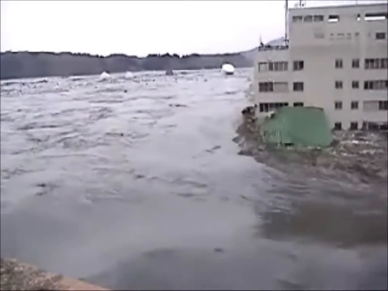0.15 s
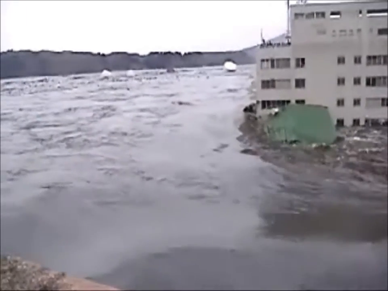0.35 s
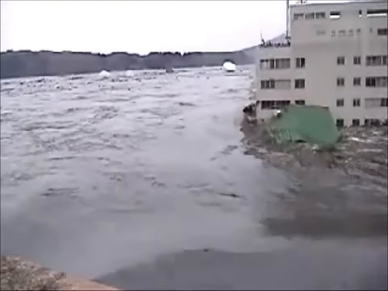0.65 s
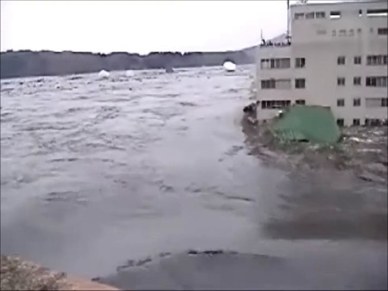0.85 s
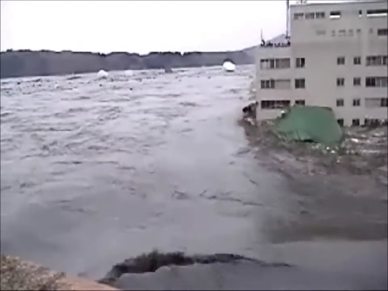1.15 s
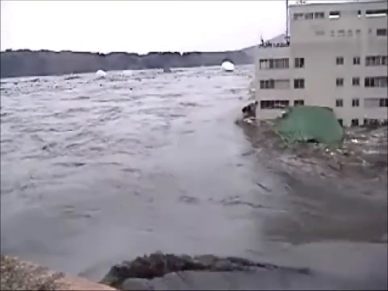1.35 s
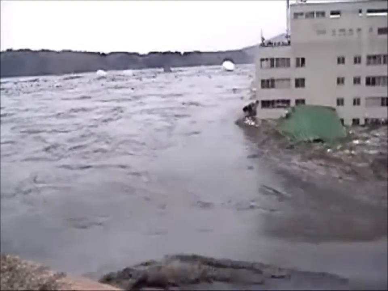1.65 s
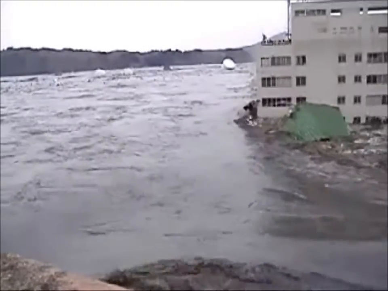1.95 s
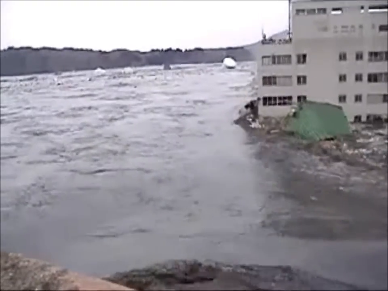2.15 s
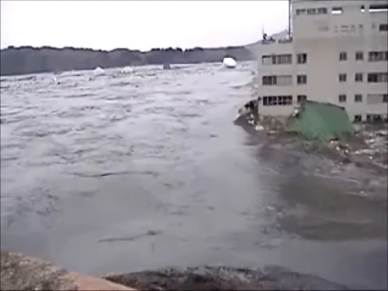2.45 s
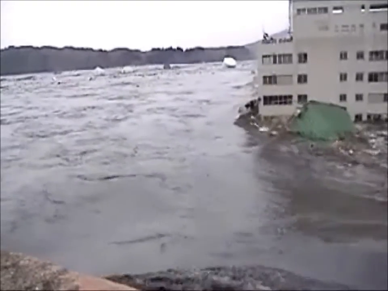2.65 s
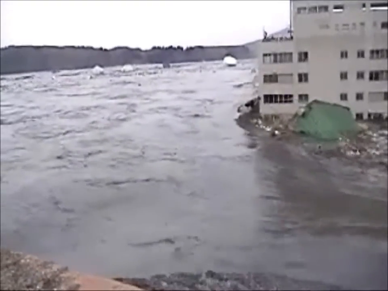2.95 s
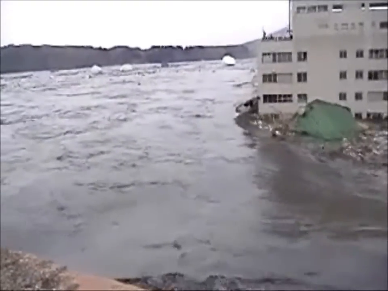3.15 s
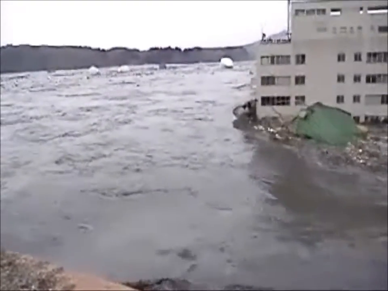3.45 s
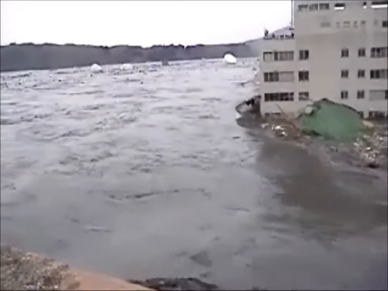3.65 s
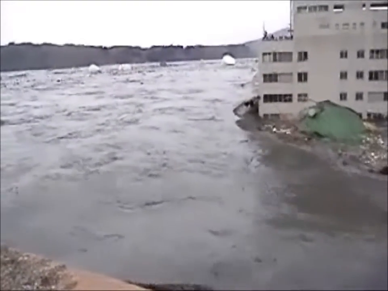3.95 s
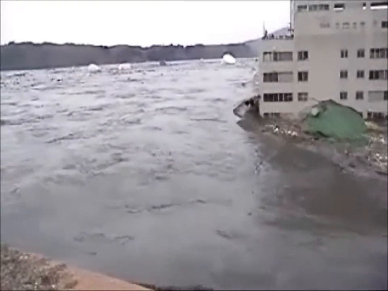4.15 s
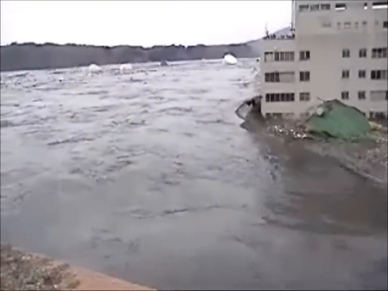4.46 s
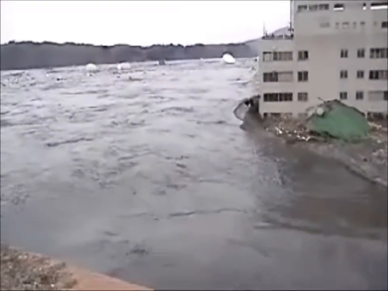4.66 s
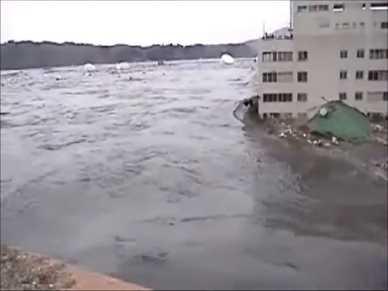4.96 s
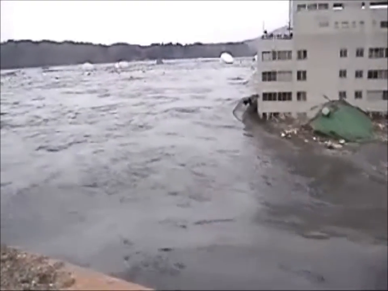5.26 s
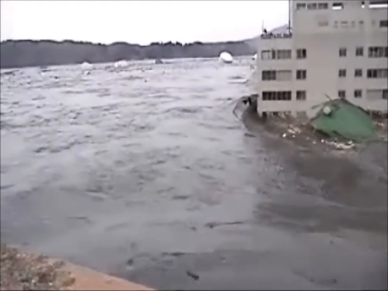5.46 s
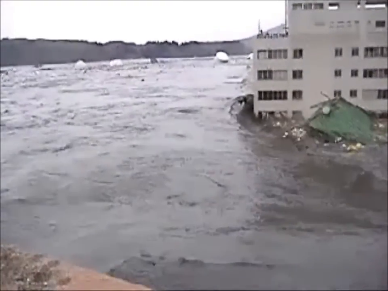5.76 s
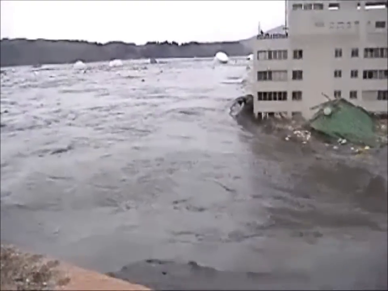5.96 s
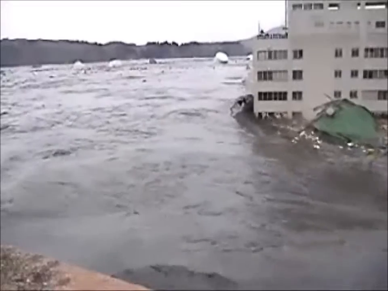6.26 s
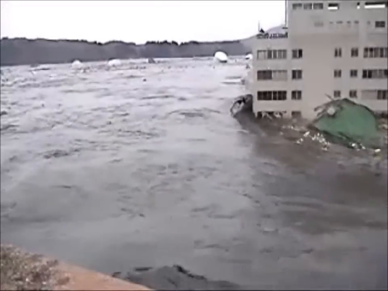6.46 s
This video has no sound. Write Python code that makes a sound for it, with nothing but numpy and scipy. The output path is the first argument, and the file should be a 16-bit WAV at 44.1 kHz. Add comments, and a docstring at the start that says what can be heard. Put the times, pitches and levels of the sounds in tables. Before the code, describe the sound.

A massive flood roars steadily through a harbour, with rushing, gurgling, hissing foam and spray, as wreckage knocks and splintering timber cracks.

```python
"""A harbour, heard in mono from a roof above the water while a tsunami pours through it.
Low-passed noise makes the roar of the flood; noise and ringing bubbles make its rush, slosh and gurgle.
Bright noise, fizz and random impulses make the foam, with splashes and single drops.
Wreckage cracks as bursts of impulses and knocks as damped modes; house fronts scatter it back.
"""
import sys
import numpy as np
from scipy import signal
from scipy.fft import rfft, irfft
from scipy.io import wavfile
from scipy.ndimage import uniform_filter1d

SR = 44100
rng = np.random.default_rng(int(sys.argv[2]) if len(sys.argv) > 2 else 0)


def materialize(psi):
    """Save the field psi as 16-bit PCM at rate SR to the path in sys.argv[1].

    A 1-D psi becomes a single channel; in a 2-D psi each row is a channel.
    """
    bounded = np.clip(np.atleast_2d(psi).T, -1, 1)
    quanta = np.round(bounded * 32767).astype(np.int16)
    wavfile.write(sys.argv[1], SR, quanta)


N = 291809
TIME = np.arange(N) / SR  # s
HZ = np.maximum(np.fft.rfftfreq(N, 1 / SR), 1)  # kept above 0 for the logarithm

# relative spectrum of the deep flood: frequency_hz, density_db [dB per Hz]
ROAR_SPECTRUM = [(12, -16), (25, -5.5), (55, 0), (100, 0.5), (175, 2.5), (230, 0.9), (310, -0.3), (410, -5),
                 (800, -11.5), (2000, -67.5)]
# relative spectrum of the broken surface: frequency_hz, density_db [dB per Hz]
RUSH_SPECTRUM = [(150, -14.5), (350, -9), (520, -2), (780, 0), (1000, -1.5), (1220, -6), (1700, -9.5),
                 (2100, -13), (4000, -53)]
# waves that swell above the steady rush: crest_s, gain_db, length_s
WAVE_SWELLS = [(0.112, 3, 0.46), (0.569, 2.6, 0.18), (1.45, 1.5, .6), (2.978, 2.5, 0.67), (5.82, 4.5, 0.12)]
# relative spectrum of foam and spray: frequency_hz, density_db [dB per Hz]
FOAM_SPECTRUM = [(600, -32), (1400, -1), (2000, 0.5), (2640, -2), (3200, -4), (4000, -5), (5000, -9),
                 (7000, -17.5), (8300, -24), (9300, -36.5)]
# course of the foam, before each layer's own gain; the slosh follows it: time_s, level_db
FOAM_LEVEL = [(0.03, -27.5), (0.62, -27.5), (0.73, -28.5), (0.795, -31.5), (0.84, -28), (1.35, -27.5),
              (1.74, -28), (1.85, -29.5), (2.4, -28.5), (2.7, -27.5), (2.82, -27), (3.5, -28), (4.4, -28.5),
              (4.85, -27.5), (5.15, -29), (5.68, -29), (5.9, -28.5), (6.58, -28.5)]
# waves breaking into spray, before the layer's gain: start_s, level_db, length_s
BREAKING_WAVES = [(0.391, -27, 0.039), (0.82, -24.5, 0.016), (0.925, -24, 0.04), (1.21, -21.5, 0.022),
                  (1.275, -21, 0.03), (1.333, -23, .012), (1.365, -21.5, .026), (1.464, -23, 0.018),
                  (1.535, -22.5, .016), (1.572, -20.5, .016), (1.603, -23, .016), (1.653, -20.5, .02),
                  (1.704, -21.5, .016), (1.757, -21, 0.022), (2.686, -19.5, 0.069), (4.765, -28, .03),
                  (4.828, -26, 0.05), (5.79, -23, 0.055)]
# relative spectrum of falling spray: frequency_hz, density_db [dB per Hz]
DROP_SPECTRUM = [(500, -10.5), (1300, 8), (2800, 5), (4200, -1), (5500, -11.5), (7500, -17.5), (9300, -34)]
# wreckage splintering, levels at the source: start_s, level_db, centre_hz, width_octaves, rise_s, t60_s
SPLINTERING = [ (2.869, -11.5, 3050, 1.9, .002, .09), (3.133, -28, 6500, 0.9, 0.0006, .03),
               (3.821, -21, 4170, 0.69, .0013, 0.052), (4.124, -18, 1920, 1.3, 0.0009, 0.16),
               (4.2555, -12.5, 3200, 1.2, .0008, .03), (4.264, -11, 4200, .6, .0008, .035),
               (4.376, -12.8, 3000, 1.4, .0009, .03), (4.92, -11, 2400, 1.7, .002, .08),
               (5.082, -18.5, 3470, 1.1, 0.00077, .035), (5.754, -11.5, 2900, .6, .0005, .13),
               (5.763, -15.3, 3300, 1.4, .002, .22), (6.184, -8.7, 3000, .8, .0004, .03),
               (6.207, -14.5, 2800, .5, .0012, .045), (6.244, -21.5, 2710, 0.74, 0.00084, 0.091),
               (6.525, -14, 3900, .55, .0008, .08), (6.537, -15.5, 4500, .7, .0008, .04),
               (6.589, -21, 4280, .5, .0005, 0.017), ]
# floating pieces colliding, levels at the source: start_s, level_db, pitch_hz, t60_s
COLLISIONS = [(0.453, -9.5, 800, .05), (0.536, -12.5, 1500, .07), (0.566, -9.5, 830, .08),
              (0.586, -11, 750, .05), (0.639, -13, 1680, .04), (0.655, -10, 1650, .06),
              (0.657, -5.5, 1070, .04), (0.68, -11, 1844, .03), (0.764, -8.5, 1740, .04),
              (0.776, -13, 2000, .025), (0.781, -4, 1140, .03), (3.822, -11.5, 1490, .055),
              (3.997, -10, 1530, .055), (4.925, -10, 1575, .07), (6.187, -11, 1285, .08),
              (6.243, -10, 1380, .075), (6.288, -16, 1290, .04)]
# modes of a floating piece: pitch_ratio (before scatter), level_db, t60_share
PIECE_MODES = [(1, 0, 1), (1.12, -8, .65), (1.53, -8, .7), (2.3, -18, .4)]

# how far the small waves move each level, dB per unit of lapping
RUSH_SWING_DB, SLOSH_SWING_DB, GURGLE_SWING_DB, FOAM_SWING_DB = 1.05, 2.4, 4, .85
SLOSH_FOLLOWS = 1.7  # dB of slosh per dB of foam
FIZZ_DB = -9  # relative to the hiss
# small debris bumping at random; its levels hold at the lowest pitch
BUMPS, BUMP_T60_S = 45, .05
BUMP_LO_HZ, BUMP_HI_HZ = 1072, 3370
BUMP_WEAK_DB, BUMP_STRONG_DB = -24, -18
PIECE_SCATTER = .05  # half the spread of the exponent that stretches the overtones
AIR_HZ, TOP_HZ = 5050, 9150  # cutoffs of the air path and of the microphone signal


def roar(level_db):
    """Turbulence: huge eddies and clouds of trapped air radiate steady broadband noise, mostly low."""
    return colour(rng.standard_normal(N), ROAR_SPECTRUM) * undb(level_db)


def rush(level_db, bubble_db, churn_db):
    """Superposition: many far waves merge into noise, while nearer bubbles resonate through it."""
    near = bubbles(lo_hz=423, hi_hz=1863, rate=700, cycles=25.6, spread_db=-1.5, count=24)
    wash = rng.standard_normal(N)
    water = colour(wash + undb(bubble_db) * near, RUSH_SPECTRUM)
    return water * undb(level_db + flow_db() + churn_db)


def flow_db():
    """Amplitude envelope: each big wave lifts the steady current's level in a Gaussian bell."""
    return sum(db * np.exp(-(2 * (TIME - crest) / length) ** 2) for crest, db, length in WAVE_SWELLS)


def slosh(level_db, lapping_db):
    """Impact noise: small waves slap the walls irregularly, harder when the water foams."""
    swing_db = 2
    foaming = curve(FOAM_LEVEL, axis=1)
    follow_db = SLOSH_FOLLOWS * (foaming - foaming.mean())
    db = level_db + follow_db + swing_db * walk(45) + lapping_db
    return unit(band(rng.standard_normal(N), 1334, 1.53)) * undb(db)


def gurgle(level_db, lapping_db):
    """Bubble resonance: large air pockets ring low, louder as each small wave folds over."""
    glugs = bubbles(lo_hz=480, hi_hz=1700, rate=150, cycles=36, spread_db=1.5, count=18)
    return unit(glugs * undb(lapping_db)) * undb(level_db)


def foam(gain_db, crackle_db, flicker_db, lapping_db):
    """Random excitation: spray hisses, ringing droplets fizz and small wreckage crackles unevenly."""
    fizz = bubbles(lo_hz=1528, hi_hz=7780, rate=930, cycles=88, spread_db=1.0, count=30)
    smear = rng.standard_normal(256) * np.exp(-TIME[:256] / 0.0022)
    crackle = unit(signal.oaconvolve(clicks(320, 1.2, N), smear)[:N])
    hiss = rng.standard_normal(N)
    spray = colour(hiss + undb(FIZZ_DB) * fizz + undb(crackle_db) * crackle, FOAM_SPECTRUM)
    return spray * undb(curve(FOAM_LEVEL, axis=1) + gain_db + flicker_db * walk(65) + lapping_db)


def splashes(level_db, drop_rate, drop_spread_db, rise_s, fall_s):
    """Droplet impact: waves break on wreckage, and spray patters and plinks down, then thins out."""
    throw = np.zeros(N)
    for start, db, length in BREAKING_WAVES:
        age = np.maximum(TIME - start, 0)
        onset = 1 - np.exp(-age / rise_s)
        thinning = np.exp(-np.maximum(age - length, 0) / fall_s)
        throw += undb(db) * onset * thinning
    plinks = bubbles(lo_hz=1500, hi_hz=5500, rate=500, cycles=90, spread_db=1.5, count=28)
    patter = unit(clicks(drop_rate, drop_spread_db, N))
    drops = patter + .5 * plinks + rng.standard_normal(N)
    return colour(drops, DROP_SPECTRUM) * throw * undb(level_db)


def droplets(level_db):
    """Lightly damped resonance: single nearby drops and bubbles ring out of the foam."""
    ringing = bubbles(lo_hz=2300, hi_hz=5200, rate=45, cycles=190, spread_db=1.5, count=36)
    return colour(ringing, DROP_SPECTRUM) * undb(curve(FOAM_LEVEL, axis=1) + level_db)


def cracks(fibre_rate, dust_db, skirt_db):
    """Fracture: timber snaps in a decaying burst of fibre impulses, a core with a wide, faint skirt."""
    out, t = np.zeros(N), TIME[:16384]
    for start, db, hz, octaves, rise, t60 in SPLINTERING:
        snaps = unit(clicks(fibre_rate, 3.3, len(t)))
        fibres = snaps + undb(dust_db) * rng.standard_normal(len(t))
        shape = (1 - np.exp(-t / rise)) * np.exp(-np.log(1000) * t / t60)
        core = band(fibres, hz, octaves)
        skirt = band(rng.standard_normal(len(t)), hz, 2 * octaves)
        burst = shape * (core + undb(skirt_db) * skirt)
        # the break releases a set energy, however the fibres share it
        burst = burst * np.linalg.norm(shape) / np.linalg.norm(burst)
        add(out, start, undb(db) * burst)
    return out


def knocks(scrape_db):
    """Modal vibration: colliding pieces ring in water-damped modes, with a scrape at the contact."""
    out, t = np.zeros(N), TIME[:4096]
    for start, db, hz, t60 in list(COLLISIONS) + bumps():
        # each piece has its own overtones
        stretch = 1 + 2 * PIECE_SCATTER * rng.standard_normal()
        ring = np.zeros(len(t))
        for ratio, mode_db, share in PIECE_MODES:
            decay = undb(mode_db - 60 * t / (t60 * share))
            ring += decay * np.sin(2 * np.pi * hz * ratio ** stretch * t)
        scrape = unit(band(rng.standard_normal(len(t)), hz, 0.55)) * np.exp(-t / 0.0063)
        add(out, start, undb(db) * (ring + undb(scrape_db) * scrape))
    return out


def bumps():
    """Size scaling: random faint collisions as rows for knocks; smaller pieces ring higher and weaker."""
    when, smallness, force = rng.random((BUMPS, 3)).T
    hz = BUMP_LO_HZ * (BUMP_HI_HZ / BUMP_LO_HZ) ** smallness
    force_db = BUMP_WEAK_DB + (BUMP_STRONG_DB - BUMP_WEAK_DB) * force
    db = force_db - 10 * np.log10(hz / BUMP_LO_HZ)
    return list(zip(when * N / SR, db, hz, np.full(BUMPS, BUMP_T60_S)))


def distance(x):
    """Air absorption: the path from wreckage to roof takes the edge off the treble."""
    return signal.sosfilt(signal.butter(3, AIR_HZ, fs=SR, output="sos"), x)


def harbour(x, wet_db, t60):
    """Diffuse reflection: house fronts return a dull, decaying tail after a 25 ms delay."""
    t = TIME[:32768]
    tail = band(rng.standard_normal(len(t)), 1300, 3.2) * undb(-60 * t / t60) * (t > .025)
    return x + undb(wet_db) * signal.fftconvolve(x, tail / np.linalg.norm(tail))[:N]


def microphone(x, notch_hz, width_hz, depth_db):
    """Destructive interference: the small microphone housing weakens one narrow band."""
    return irfft(rfft(x) * undb(-depth_db / (1 + ((HZ - notch_hz) / width_hz) ** 2)), N)


def gain_control(x, window_s, squeeze):
    """Dynamic compression: gain falls as short-term power swells, so the level is more even."""
    power = uniform_filter1d(x ** 2, max(int(window_s * SR), 1)) + 1e-9
    return x * (np.mean(power) / power) ** (np.clip(squeeze, 0, 1) / 2)


def bubbles(lo_hz, hi_hz, rate, cycles, spread_db, count):
    """Bubble resonance: each size rings, falling 60 dB in some cycles, and rises in pitch."""
    out, t = np.zeros(N), TIME[:2048]
    for hz in np.geomspace(lo_hz, hi_hz, count):
        age = t * hz / cycles
        # the pitch climbs as the bubble nears the surface
        phase = 2 * np.pi * hz * t * (1 + 0.13 * np.minimum(age, 1))
        ring = np.exp(-np.log(1000) * age) * np.sin(phase)
        starts = clicks(rate / count, spread_db, N)
        out += np.sqrt(hz) * unit(signal.oaconvolve(starts, ring)[:N])
    return unit(out)


def clicks(rate, spread_db, size):
    """Random point process: impulses of either sign, their dB levels spread exponentially."""
    happens = rng.random(size) < rate / SR
    strength = undb(spread_db * np.minimum(rng.exponential(size=size), 5))
    return happens * strength * np.sign(rng.standard_normal(size))


def walk(rate):
    """Random modulation: straight lines between random knots, rate per second, at rms 1."""
    knots = rng.standard_normal(2048)
    return unit(np.interp(TIME * rate, np.arange(len(knots)), knots))


def colour(x, points):
    """Spectral shaping: filter by (Hz, dB) points on a logarithmic frequency axis, to rms 1."""
    hz, db = np.transpose(points)
    gain = undb(np.interp(np.log(HZ), np.log(hz), db))
    return unit(irfft(rfft(x) * gain, N))


def band(x, hz, octaves):
    """Band limitation: a steep band-pass around a centre."""
    edges = np.clip(hz * 2 ** (np.array([-.5, .5]) * max(octaves, .1)), 10, SR / 2 - 100)
    return signal.sosfilt(signal.butter(3, edges, "bandpass", fs=SR, output="sos"), x)


def curve(table, axis):
    """Linear interpolation: one column of a time table at every sample."""
    rows = np.array(table)
    return np.interp(TIME, rows[:, 0], rows[:, axis])


def add(out, start, sound):
    """Superposition: mix a sound in at a time in seconds."""
    i = max(int(start * SR), 0)
    out[i:i + len(sound)] += sound[:max(N - i, 0)]


def undb(db):
    """Logarithmic level: decibels to amplitude gain."""
    return 10 ** (np.asarray(db) / 20)


def unit(x):
    """Effective value: scale to rms 1."""
    return x / np.sqrt(np.mean(x ** 2) + 1e-18)


def scene():
    """Common modulation: each small wave lifts rush, slosh, gurgle and foam together; wreckage joins."""
    lapping = unit(walk(9) + walk(30))
    water = roar(level_db=-17.0)
    water = water + rush(level_db=-21.5, bubble_db=-12.0, churn_db=RUSH_SWING_DB * lapping)
    water = water + slosh(level_db=-31.0, lapping_db=SLOSH_SWING_DB * lapping)
    water = water + gurgle(level_db=-31, lapping_db=GURGLE_SWING_DB * lapping)
    spray = foam(gain_db=3.0, crackle_db=-8.5, flicker_db=0.4, lapping_db=FOAM_SWING_DB * lapping)
    spray = spray + splashes(level_db=1, drop_rate=2800, drop_spread_db=2.2, rise_s=0.006, fall_s=0.009)
    spray = spray + droplets(level_db=-12.5)
    wreckage = cracks(fibre_rate=5100, dust_db=2.5, skirt_db=-20) + knocks(scrape_db=-6)
    wreckage = harbour(distance(wreckage), wet_db=-19, t60=.4)
    return (water + spray + wreckage)[None]


def record(dry):
    """Transducer chain: notch the sound, even its level, round the peaks and cut the top."""
    sound = microphone(dry, notch_hz=2042, width_hz=196, depth_db=6.5)
    sound = gain_control(sound, window_s=0.012, squeeze=0.45)
    ceiling = .75  # peaks bend smoothly towards this amplitude
    sound = sound / (1 + (sound / ceiling) ** 4) ** .25
    return signal.sosfilt(signal.ellip(10, .2, 90, TOP_HZ, fs=SR, output="sos"), sound)


dry = scene()
out = record(dry)
materialize(out)
```